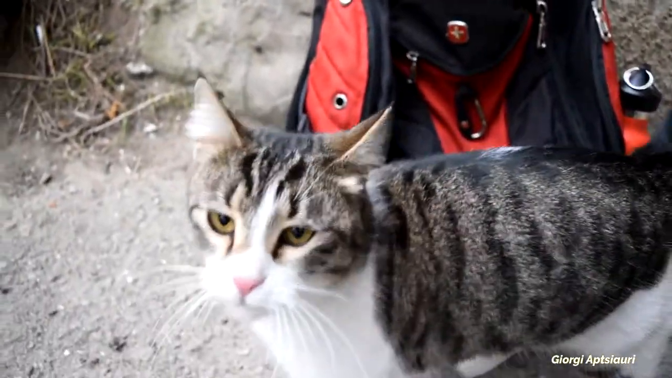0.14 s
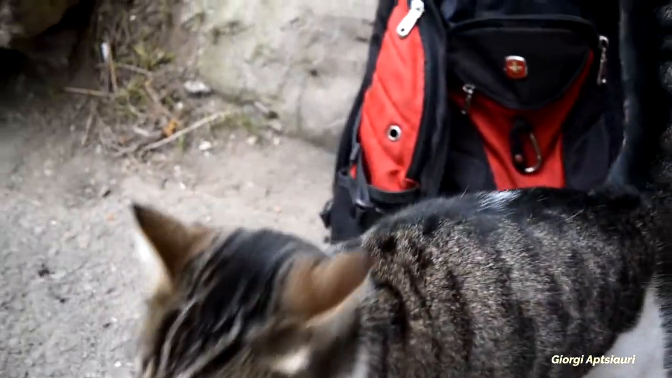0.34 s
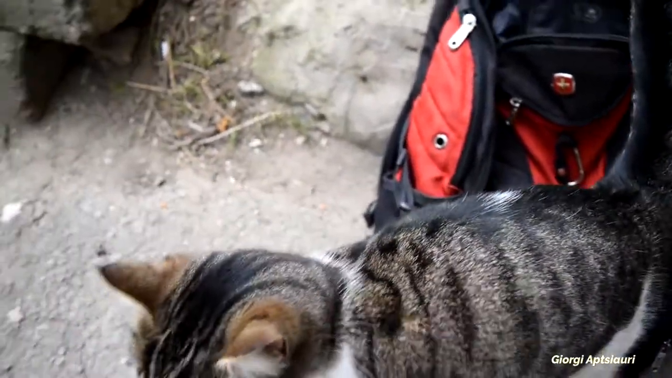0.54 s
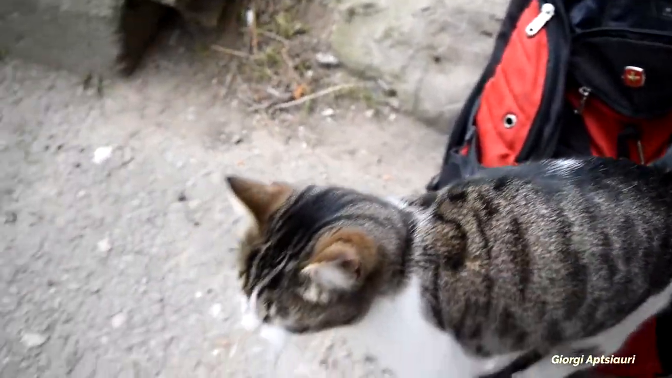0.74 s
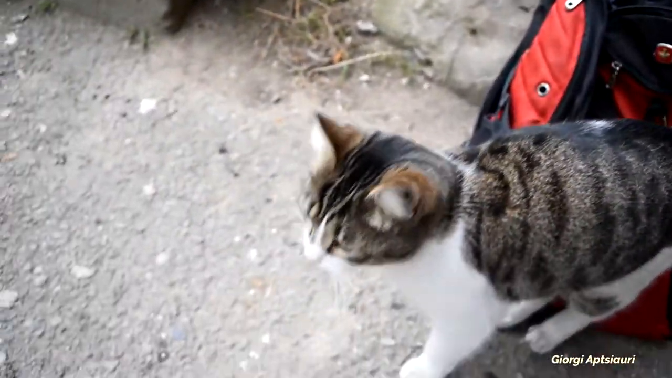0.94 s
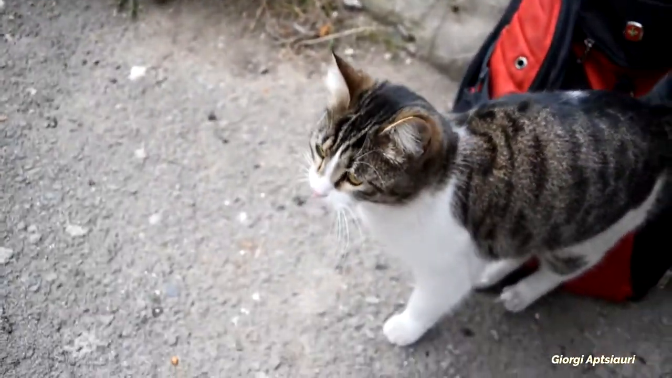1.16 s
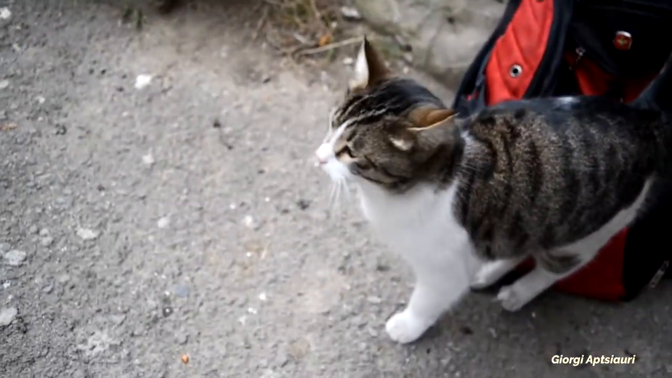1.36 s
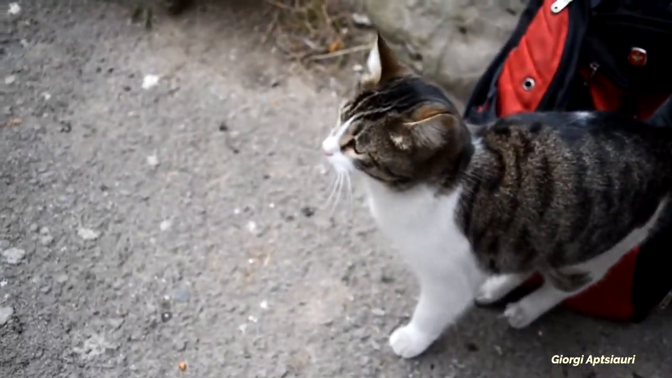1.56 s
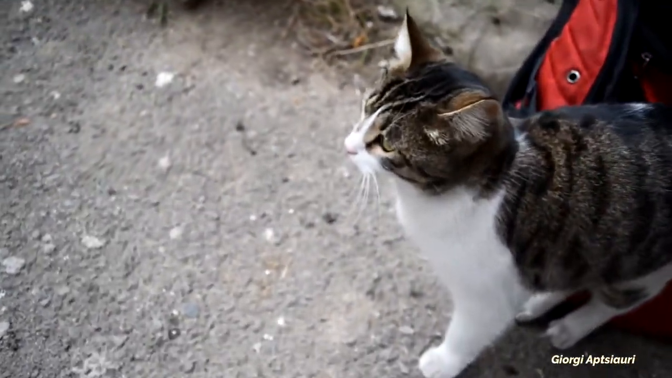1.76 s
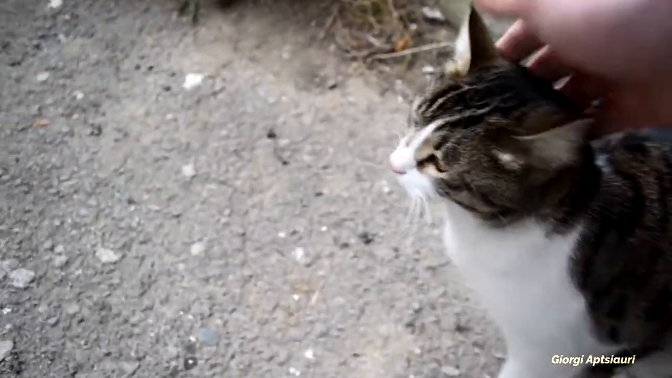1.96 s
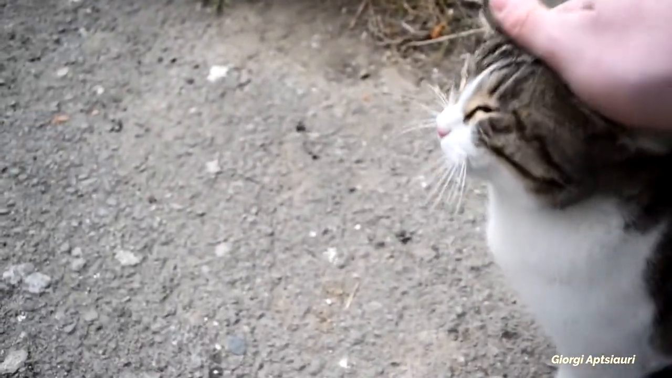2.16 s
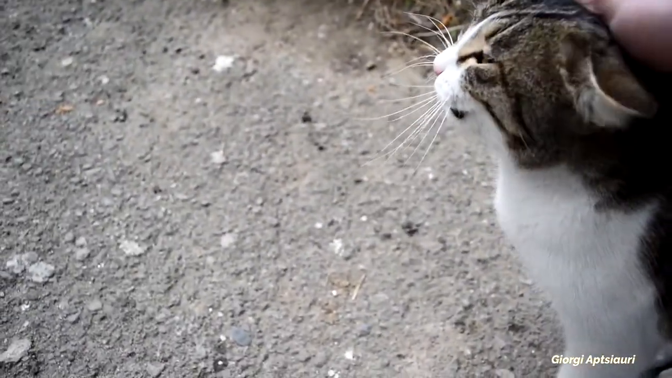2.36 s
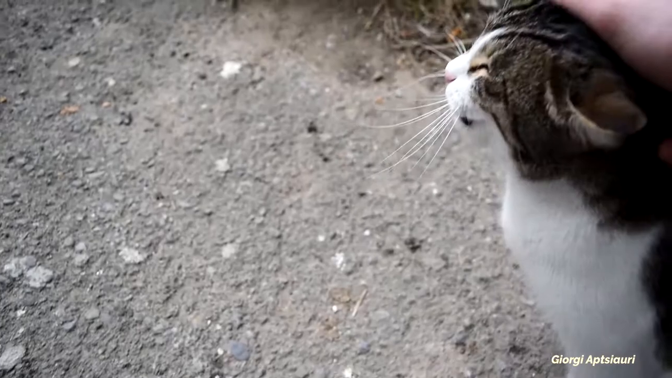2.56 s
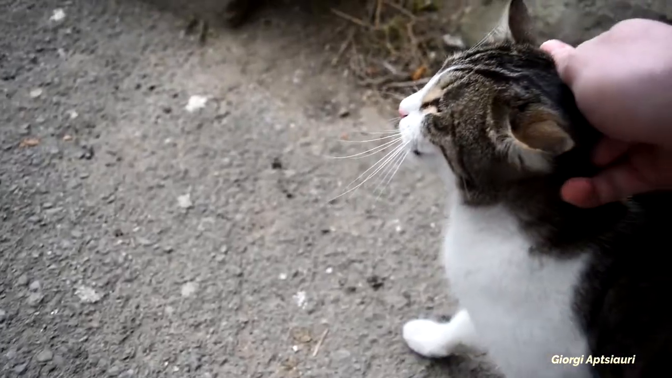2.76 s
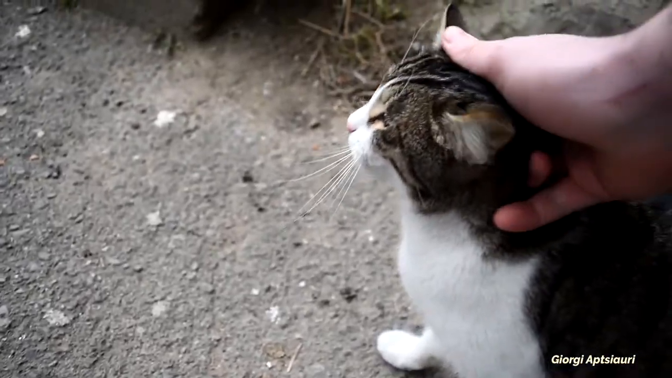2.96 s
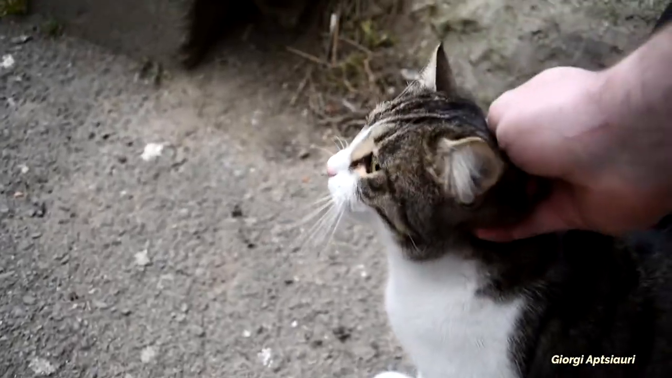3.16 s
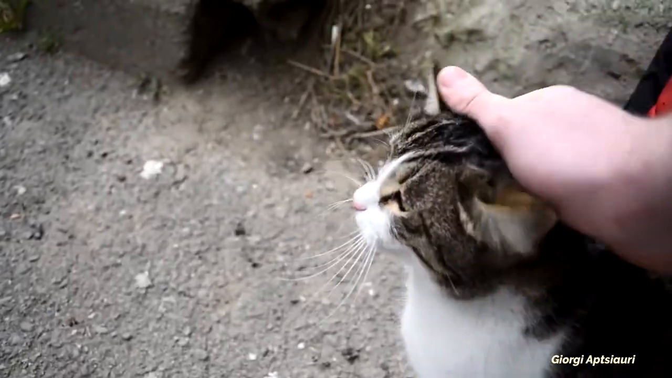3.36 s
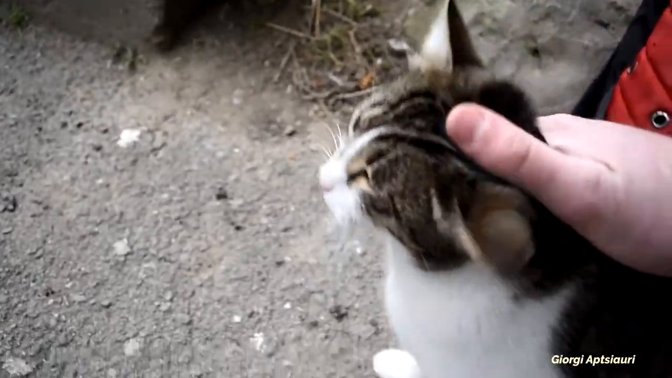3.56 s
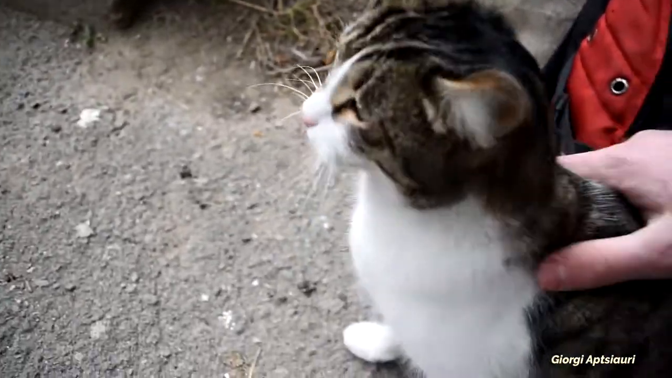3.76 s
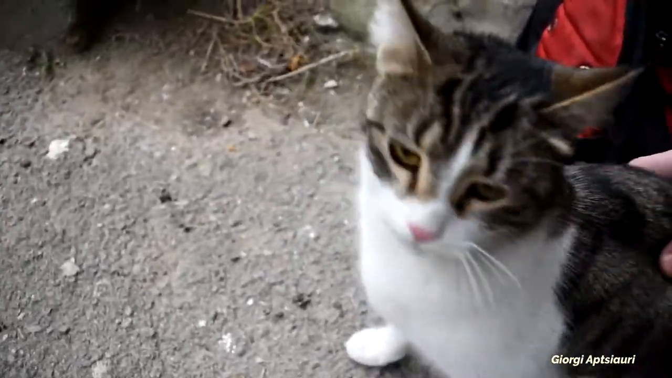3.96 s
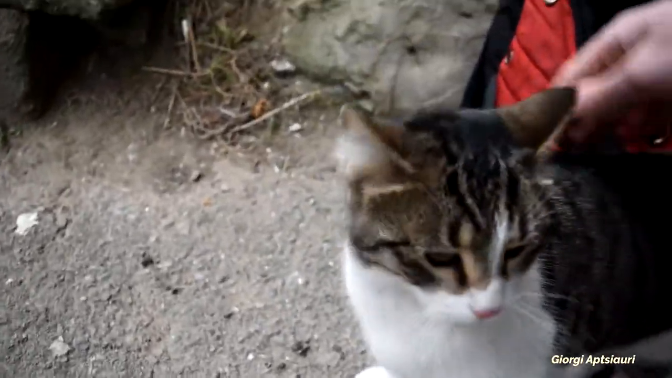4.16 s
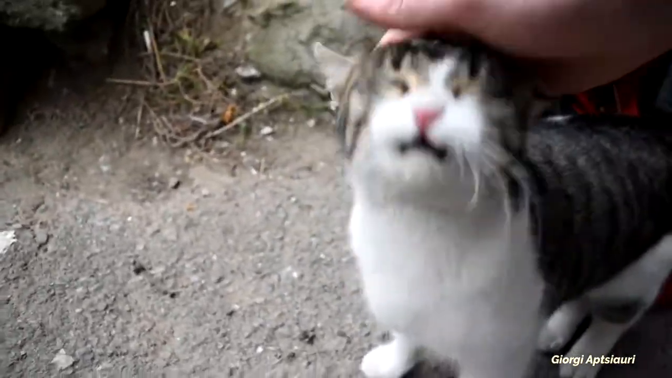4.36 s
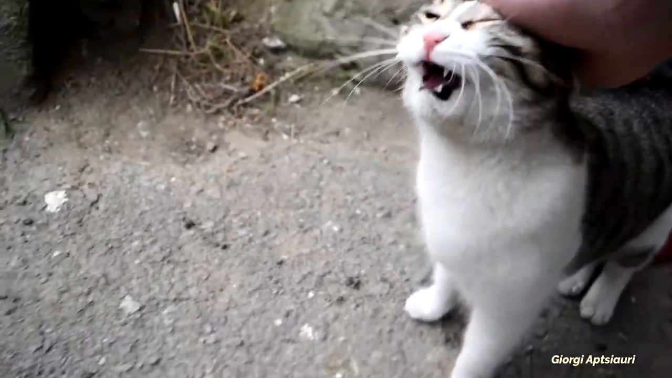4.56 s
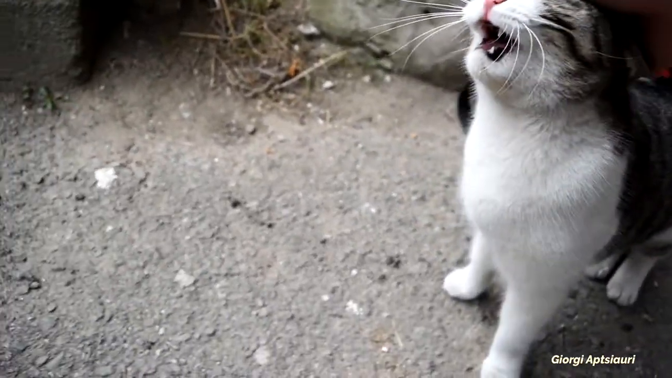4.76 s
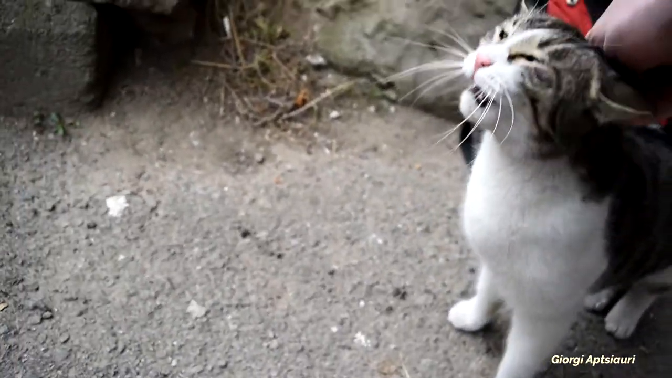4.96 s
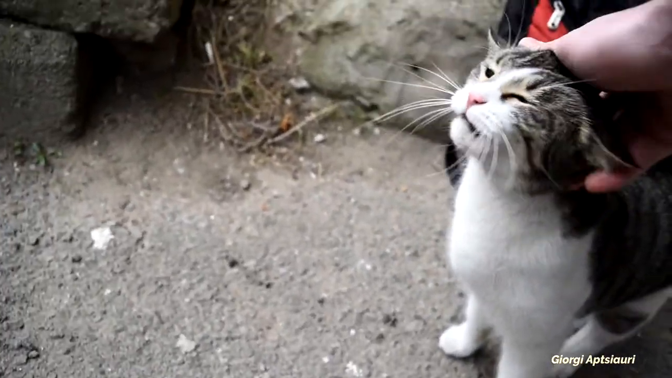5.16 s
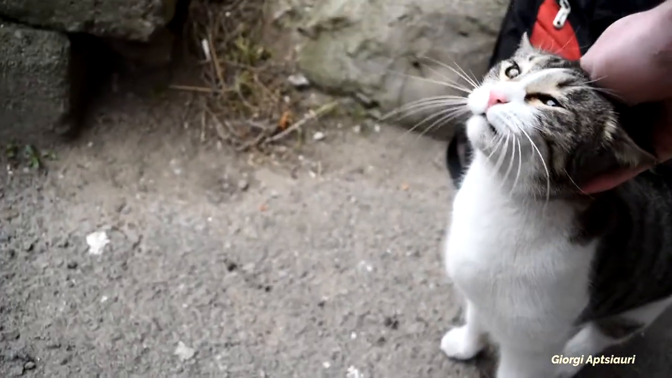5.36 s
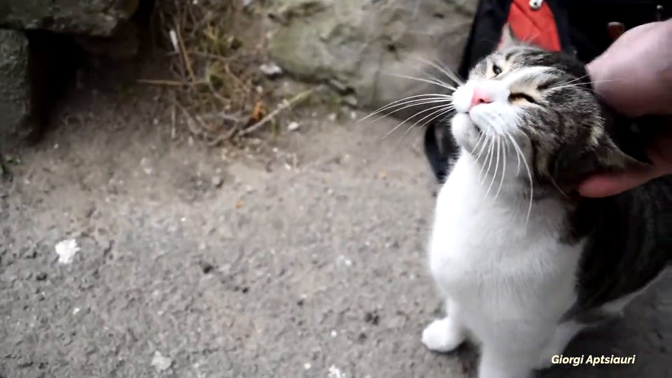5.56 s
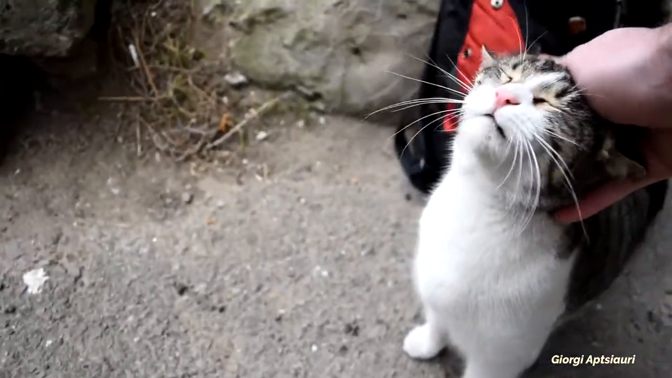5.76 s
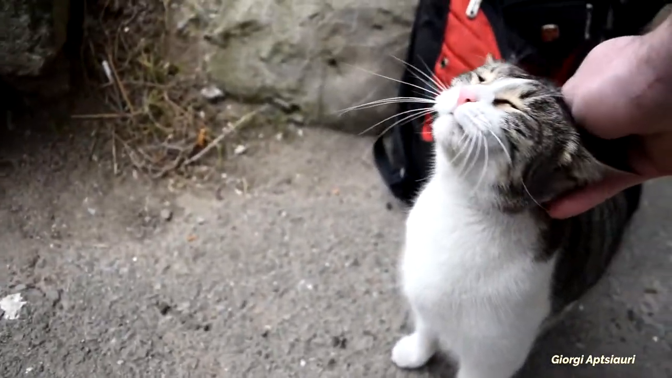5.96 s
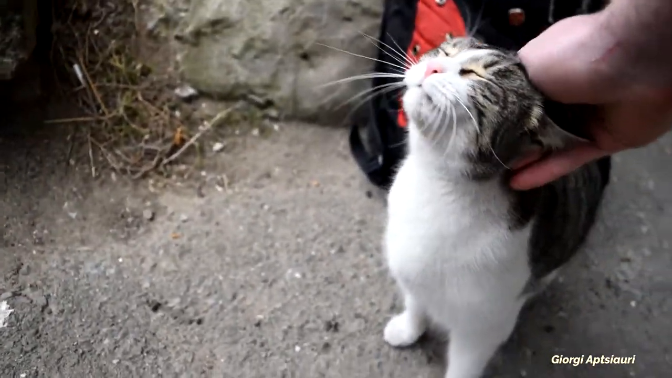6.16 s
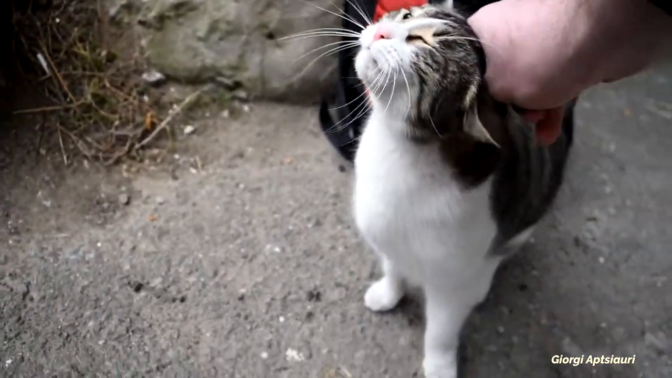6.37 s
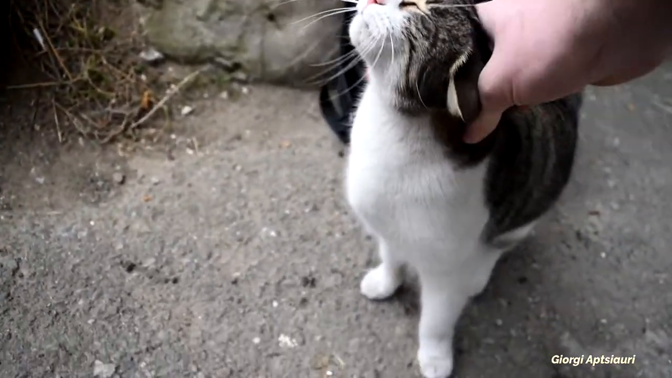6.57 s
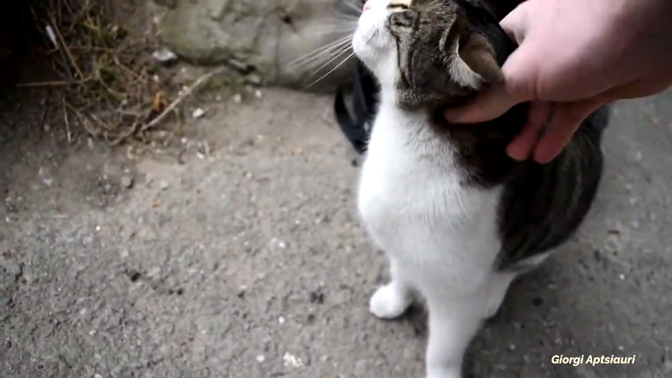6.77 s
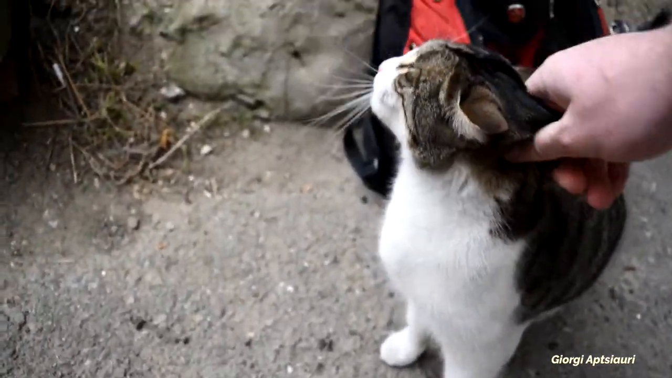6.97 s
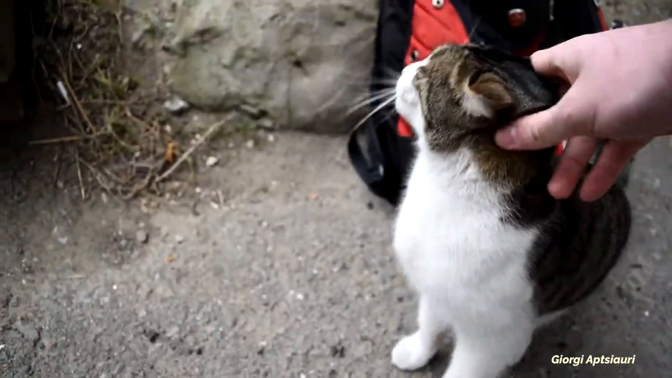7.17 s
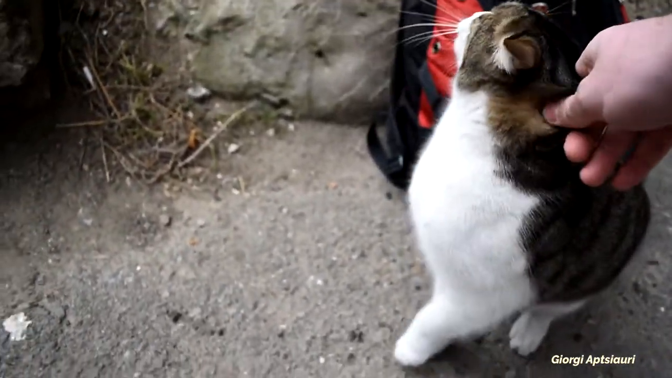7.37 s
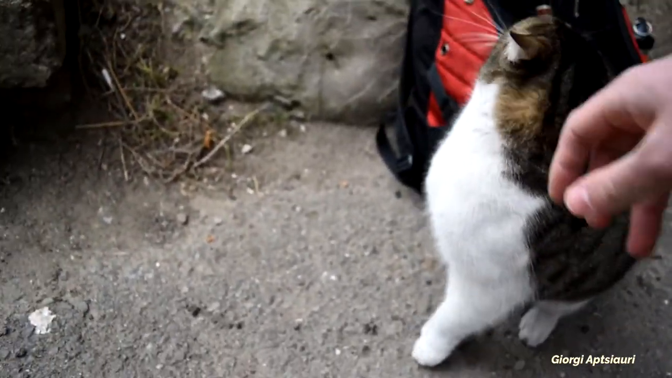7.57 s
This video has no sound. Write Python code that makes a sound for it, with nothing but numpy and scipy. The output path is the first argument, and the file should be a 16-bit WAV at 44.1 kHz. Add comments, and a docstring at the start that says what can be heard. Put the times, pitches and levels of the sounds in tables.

```python
"""A petted cat meows

On an asphalt path, close by, a cat meows three times. Its vocal folds glide up and back in pitch,
its opening mouth shapes the tone, and throbs of purring break into the start or end of each meow.
A shoe scuffs, grit clicks, dull taps sound, a jacket rustles and a hand strokes fur.
A sleeve swishes at the end, and traffic murmurs far off throughout."""
import sys
import numpy as np
from scipy import signal
from scipy.fft import rfft, irfft, next_fast_len
from scipy.io import wavfile
from scipy.ndimage import map_coordinates

SR = 44100
rng = np.random.default_rng(int(sys.argv[2]) if len(sys.argv) > 2 else 0)


def transcribe(signal):
    """Save signal, clipped to [-1, 1], as a 16-bit WAV file at the path in sys.argv[1]."""
    frames = np.atleast_2d(signal).T
    limited = np.clip(frames, -1, 1)
    pcm = np.round(limited * 32767).astype(np.int16)
    wavfile.write(sys.argv[1], SR, pcm)


N = 335601

# The tone of each noise, from low to high: frequency_hz, level_db
TRAFFIC_TONE = [(22, -21), (40, -5), (65, -6.5), (130, -4), (320, -9.5), (520, -11), (1100, -10),
                (1840, -14), (3400, -22.5), (4300, -20.5), (5300, -28), (5850, -21.5), (6400, -28),
                (7200, -25), (11000, -33.5), (15700, -37)]
SCUFF_TONE = [(120, -35), (200, -10.5), (360, -25.5), (522, -4.5), (1270, -9), (1780, -7), (4910, -25),
              (5760, -26.5), (8070, -23.5), (14000, -46.5)]
CRACK_TONE = [(200, -33), (800, -16), (2100, -17.5), (4300, -10), (6000, -5.5), (7500, -17), (10400, -19.5),
              (15500, -33)]
CLOTH_TONE = [(1200, -34), (2500, -4.5), (4200, 1), (5900, -3), (7200, -5.5), (10000, -10.5), (15500, -29)]
FUR_TONE = [(5000, -11), (7200, -10), (8200, -1.5), (10000, -6.5), (12500, -18), (15000, -26)]
SLEEVE_TONE = [(35, -43), (60, -15), (253, -4), (285, -16), (312, -9.5), (533, -4), (910, -10.5),
               (2710, -8), (3500, -13), (4120, -7.5), (9080, -16.5), (15500, -31)]
# How alike a noise is on the left and right: frequency_hz, likeness (1 = the same)
STEREO_LIKENESS = [(100, 1), (1500, 0.98), (3100, 0.92), (6800, 0.64), (14000, .1)]
# Swells of a far engine, a dragging shoe and a stroking hand: middle_s, half_length_s, level_db
ENGINE_SURGES = [(6.15, 0.18, -61.5), (6.78, .1, -60)]
SHOE_PUSHES = [(.595, .04, -49.5), (.703, 0.04, -42.5), (.823, 0.055, -46)]
HAND_STROKES = [(2.5, 0.16, -61), (2.93, 0.2, -62), (4.58, 0.31, -60.5), (5.91, 0.08, -64.5),
                (6.2, .11, -63.5)]
# The glide and effort of each meow, before purring is added: time_s, pitch_hz, relative_level_db
FIRST_MEOW = [(.235, 559.5, -54), (.283, 545, -54), (.308, 593, -44.5), (.342, 607, -43),
              (0.371, 645, -54.5), (.42, 801, -51.5), (0.492, 833, -60.5), (0.534, 788.4, -50.5),
              (0.599, 866, -53), (.7, 787, -52.5), (.87, 763, -69)]
SECOND_MEOW = [(2.15, 640, -78), (2.228, 622, -55.5), (2.265, 637.6, -48), (2.33, 772, -42.5),
               (2.371, 810, -46), (2.405, 888, -51), (2.484, 888, -51.5), (2.525, 796, -53.5),
               (2.62, 816, -53), (2.759, 780, -52), (2.8, 782, -78)]
THIRD_MEOW = [(4.32, 473, -71), (4.455, 470.4, -55.5), (4.486, 524.5, -47.5), (4.518, 601, -41),
              (4.56, 704.4, -44.5), (4.6, 769, -42.5), (4.688, 891, -44.5), (4.72, 833, -43.5),
              (4.774, 830, -43.5), (4.844, 761.6, -47), (4.906, 784, -47), (4.96, 740, -59.5),
              (5.11, 728, -57)]
# The mouth in each meow. A resonance is a range of frequencies that it boosts:
# opens_s, mouth_resonance_hz, sharpness_q, upper_resonance_hz, treble_db, top_note_darkening_db
MOUTH_SHAPES = [(0.274, 2010, 3, 7300, -9, 3.5), (2.239, 2116, 12, 6850, -9.5, 9),
                (4.436, 2350, 4.5, 8040, -1, 4)]
# How the throat and nose colour the voice: frequency_hz, gain_db
THROAT_TONE = [(480, -8.5), (650, -13.5), (880, -8.2), (1270, 2.5), (1920, -2.5), (2480, 1.5), (3150, -3.5),
               (3850, -4.5), (4850, -13.5), (6250, -4.5), (7300, .5), (8800, 1.5), (11500, -11.5)]
# Runs of purr throbs: first_s, last_s, spacing_s, first_gain_db, last_gain_db, roughness (0 to 1)
PURR_RUNS = [(.271, .324, .0265, -6, -5, .2), (2.184, 2.247, .0315, 2, 0, .5),
             (2.553, 2.742, .0315, 6, -4.5, .16), (4.957, 5.016, .0295, 10.5, 15, .06),
             (5.033, 5.084, .017, 12, 11.5, .18)]
# How far the voice's wave is ahead at the right microphone: frequency_hz, lead_radians
RIGHT_LEAD = [(5500, 0.066), (8500, 0.98), (12000, .4)]
# Dull taps: start_s, peak_db, pitch_hz
DULL_TAPS = [(.427, -38, 2040), (0.451, -33, 740), (0.588, -32, 1840), (1.365, -42, 1390),
             (1.392, -33.5, 1390), (1.499, -35, 1000), (4.072, -40.5, 1930), (5.088, -27, 800),
             (5.111, -31.5, 745), (5.3798, -32, 554), (5.393, -35, 794)]
# Sharp clicks of breaking grit: start_s, level_db
GRIT_CLICKS = [(0.5863, -38), (1.4317, -36), (1.472, -36), (1.5, -33.5), (1.5266, -17.5), (1.532, -27.5),
               (4.431, -33.5)]
# The notes that grit rings with: pitch_hz, width_hz (wider dies sooner), relative_level_db
GRIT_RINGS = [(820, 580, -22), (1430, 110, -20), (2440, 180, 6.5), (4630, 130, -18), (4960, 85, -30),
              (6340, 130, 2)]
# Light rustles of a jacket: middle_s, half_length_s, low_swish_db, high_hiss_db
JACKET_SHIFTS = [(1.039, 0.015, -66, -58.5), (1.119, 0.019, -79, -55.5), (1.487, 0.035, -55.5, -53.5),
                 (1.958, 0.065, -56, -63), (2.1, 0.067, -79, -62.5), (2.878, 0.24, -70, -65),
                 (3.528, 0.028, -56, -59), (3.86, 0.12, -60, -76), (4.426, 0.11, -59, -63.5),
                 (5.428, 0.11, -56, -59), (6.17, 0.042, -61.5, -60.5)]

SHUT_HZ, SHUT_ROUGHNESS = 600, .2  # closed lips make a low, hoarse murmur
LIPS_S, JAW_S = .0067, .07  # the lips part quickly, then the jaw widens more slowly
MOUTH_RISE, UPPER_RISE = .26, .56  # a narrow jaw holds each resonance down by this share
TOP_NOTE_HZ, TOP_NOTE_WIDTH_HZ = 834, 38  # above this pitch the voice turns soft and pure
THROB_HALF_S, THROB_SCATTER = .007, .139  # half a throb's length; how much throbs vary
THROB_SAG, THROB_DULL_DB = .15, 3  # share of pitch, and treble, lost in a typical throb
DEEPEN_PER_S = 4.84  # the pitch sags further as a run of throbs goes on


def amp(db):
    """Turn decibels into a gain to multiply by."""
    return 10 ** (np.asarray(db) / 20)


def unit(x):
    """Scale a signal to an average (rms) level of 1."""
    return x / np.sqrt(np.mean(x ** 2) + 1e-20)


def along(points, hz):
    """Read between the rows of a frequency table, on a log scale."""
    freqs, values = np.transpose(points)
    return np.interp(np.log(hz + 1), np.log(freqs + 1), values)


def step(x):
    """A soft step from 0 to 1 around x = 0."""
    return .5 + .5 * np.tanh(x / 2)


def wobble(rate, t):
    """A smooth curve through `rate` random values a second."""
    return map_coordinates(rng.standard_normal(size=4096), [(t - t[0]) * rate], mode="wrap")


def swells(rows, t):
    """A gain made of one bell-shaped rise and fall for each row."""
    return sum(amp(db) * np.exp(-((t - s) / half) ** 2 / 2) for s, half, db in rows)


def filtered(x, response):
    """Multiply each frequency in x by response(hz)."""
    n = x.shape[-1]
    padded = next_fast_len(n + SR // 4)
    return irfft(rfft(x, padded) * response(np.fft.rfftfreq(padded, 1 / SR)), padded)[..., :n]


def add(track, start_s, sound):
    """Mix a sound into a track."""
    part = track[..., round(start_s * SR):][..., :sound.shape[-1]]
    part += sound[..., :part.shape[-1]]


def stereo_noise(tone):
    """Noise with the given tone, nearly the same on both sides in the bass."""
    def response(hz):
        spread = np.arccos(np.clip(along(STEREO_LIKENESS, hz), -1, 1)) / 2
        return amp(along(tone, hz)) * [np.cos(spread), np.sin(spread)]
    mid, side = filtered(rng.standard_normal((2, N)), response)
    return unit(np.array([mid + side, mid - side]))


def town(t, traffic_db=-55.5, sway_db=1.5, engine_hz=64, idle_db=-69):
    """Distant traffic murmurs while one engine swells and fades over its idle."""
    hum = np.sin(2 * np.pi * np.cumsum(engine_hz + 3 * wobble(5, t)) / SR)
    engine = hum * (amp(idle_db) + swells(ENGINE_SURGES, t)) * amp(2.2 * wobble(3.1, t))
    return amp(traffic_db + sway_db * wobble(4, t)) * stereo_noise(TRAFFIC_TONE) + engine


def resonance(hz, centre_hz, q):
    """Air in the mouth boosts sound near centre_hz, more sharply for a higher q."""
    return 1 / (1 - (hz / centre_hz) ** 2 + 1j * hz / (centre_hz * q))


def meow(glide, opens_s, open_hz, mouth_q, upper_hz, treble_db, dark_db, breath_db=-29):
    """The vocal folds make harmonics (multiples of the pitch), and the moving mouth shapes them."""
    times, notes, levels = np.transpose(glide)
    t = np.arange(int(times[0] * SR), int(times[-1] * SR)) / SR
    note_hz, level_db = np.interp(t, times, notes), np.interp(t, times, levels)
    sag, throb_db, hoarse = purr(t)
    pitch_hz = note_hz * (1 - sag)

    parted = step((t - opens_s) / LIPS_S)
    narrow = np.exp(-np.maximum(t - opens_s, 0) / JAW_S)
    mouth_hz = SHUT_HZ + (open_hz * (1 - MOUTH_RISE * narrow) - SHUT_HZ) * parted

    # slack or feeble folds vibrate unevenly
    slack = np.clip((570 - note_hz) / 170, 0, .4)
    feeble = np.clip((-57 - level_db) / 40, 0, .2)
    rough = np.maximum(hoarse + slack + feeble, SHUT_ROUGHNESS * (1 - parted))
    waver = .008 * wobble(110, t) + .006 * wobble(500, t) + .062 * rough * wobble(700, t)
    cycles = np.cumsum(pitch_hz * (1 + waver)) / SR

    harmonic = np.arange(1, 20)[:, None]
    hz = harmonic * pitch_hz
    treble = np.clip((hz - 2500) / 700, 0, 1)  # only the treble depends on where the head points
    bright_db = (treble_db - THROB_DULL_DB * sag / THROB_SAG) * treble
    pure_db = dark_db * step((note_hz - TOP_NOTE_HZ) / TOP_NOTE_WIDTH_HZ) * np.maximum(3 - harmonic, 0)
    weights = amp(along(THROAT_TONE, hz) + bright_db + pure_db) * resonance(hz, mouth_hz, mouth_q)
    weights *= resonance(hz, upper_hz * (1 - UPPER_RISE * narrow), q=12)
    weights /= np.linalg.norm(weights, axis=0)

    # swirling breath spreads noise around every harmonic
    swirl = np.array([wobble(650, t) + 1j * wobble(650, t) for _ in harmonic])
    breath = (amp(breath_db) + 1.65 * rough) * swirl
    voice = np.real(weights * (1 + breath) * np.exp(2j * np.pi * harmonic * cycles)).sum(0)
    fade = np.clip(np.minimum(t - t[0], t[-1] - t) / .0087, 0, 1)
    flicker_db = 1.7 * wobble(70.6, t)
    return np.sqrt(2) * voice * fade * amp(level_db + throb_db + flicker_db)


def purr(t):
    """Each throb squeezes the voice box: the pitch sags, the level shifts and the voice roughens."""
    sag, gain_db, rough = np.zeros((3, len(t)))
    for first_s, last_s, spacing_s, first_db, last_db, hoarse in PURR_RUNS:
        for s in np.arange(first_s, last_s + spacing_s / 2, spacing_s):
            half_s = THROB_HALF_S * rng.normal(1, THROB_SCATTER)
            squeeze = np.exp(-np.abs((t - s) / half_s) ** 3)
            depth = THROB_SAG * (1 + DEEPEN_PER_S * (s - (first_s + last_s) / 2))
            sag += squeeze * depth * rng.normal(1, THROB_SCATTER)
            gain_db += squeeze * np.interp(s, [first_s, last_s], [first_db, last_db])
            rough += squeeze * hoarse
    return sag, gain_db, rough


def cat(boost_db=4.5):
    """Two meows with the head turned aside, then a brighter one straight at the two microphones."""
    voice = np.zeros(N)
    for glide, mouth in zip((FIRST_MEOW, SECOND_MEOW, THIRD_MEOW), MOUTH_SHAPES):
        add(voice, glide[0][0], meow(glide, *mouth))
    sides = np.array([[-1], [1]])
    return filtered(voice * amp(boost_db), lambda hz: np.exp(.5j * along(RIGHT_LEAD, hz) * sides))


def wall_echo(sound, fade_s=.42):
    """The ground and a stone wall scatter back a short echo."""
    t = np.arange(SR // 4) / SR
    tail = rng.standard_normal((2, len(t))) * amp(-60 * t / fade_s) * (t > .003)
    tail += 2 * tail.mean(0)  # makes left and right more alike
    return signal.fftconvolve(sound[None], tail / np.linalg.norm(tail[0]), axes=1)[:, :N]


def taps(rise_s=.00034, fade_s=.0086):
    """Each dull tap is a little noise and a note that rings for only a few cycles."""
    out, t = np.zeros(N), np.arange(SR // 20) / SR
    envelope = amp(-60 * t / fade_s) * (1 - np.exp(-t / rise_s))
    for start_s, peak_db, pitch_hz in DULL_TAPS:
        noise = unit(filtered(rng.standard_normal(len(t)), lambda hz: 1 / (1 + (hz / 3000) ** 2)))
        tap = (np.sin(2 * np.pi * pitch_hz * t) + .45 * noise) * envelope
        add(out, start_s, amp(peak_db) * tap / np.abs(tap).max())
    return out


def friction(noise, t, grain_db):
    """Rubbing surfaces catch and slip in countless tiny steps, which makes their noise grainy."""
    return noise * unit(amp(grain_db * wobble(450, t)))


def shoe_scuffs(t):
    """A sole drags over asphalt in three pushes."""
    return swells(SHOE_PUSHES, t) * friction(stereo_noise(SCUFF_TONE), t, grain_db=2.5)


def grit(hold_s=.00072, fade_s=.018, crack_db=-5.5, ring_db=-17):
    """Each grain cracks and briefly rings, so close that the two microphones hear it differently."""
    out, t = np.zeros((2, N)), np.arange(SR // 20) / SR
    envelope = amp(-60 * np.maximum(t - hold_s, 0) / fade_s)
    for start_s, level_db in GRIT_CLICKS + crunch():
        cutoff_hz = 15000 * amp(.095 * (level_db + 22))  # a harder break is brighter
        noise = rng.standard_normal(len(t)) + .99 * rng.standard_normal((2, len(t)))
        crack = filtered(noise, lambda hz: amp(along(CRACK_TONE, hz)) / (1 + (hz / cutoff_hz) ** 4))
        ring = np.zeros(len(t))
        for pitch_hz, width_hz, db in GRIT_RINGS:
            strength = amp(db) * rng.normal(1, .099)
            ring += strength * np.exp(-np.pi * width_hz * t) * np.sin(2 * np.pi * pitch_hz * t)
        click = amp(crack_db) * unit(crack) * envelope + amp(ring_db) * ring
        add(out, start_s, amp(level_db) * click)
    return out


def crunch(count=8, from_s=1.445, to_s=1.522, level_db=-40.5, spread_db=2):
    """Small grains give way under weight before the big one snaps. Gives rows of start_s, level_db."""
    times = from_s + (to_s - from_s) * (np.arange(count) + rng.random(count)) / count
    return list(zip(times, rng.normal(level_db, spread_db, count)))


def jacket_rustles(t):
    """Cloth rubs as a jacket shifts, making a low swish and a high hiss."""
    swish = swells([(s, half, db) for s, half, db, _ in JACKET_SHIFTS], t)
    hiss = swells([(s, half, db) for s, half, _, db in JACKET_SHIFTS], t)
    return friction(swish * stereo_noise(SCUFF_TONE) + hiss * stereo_noise(CLOTH_TONE), t, grain_db=1.9)


def fur_strokes(t):
    """A palm slides over fur with a soft, high hiss."""
    return swells(HAND_STROKES, t) * friction(stereo_noise(FUR_TONE), t, grain_db=1.5)


def sleeve_swish(t, peak_s=7.29, peak_db=-42, rise_db_per_s=65, fall_db_per_s=258):
    """An arm pulls back: its sleeve gets louder as it gathers speed, then stops short."""
    level_db = peak_db - np.maximum(rise_db_per_s * (peak_s - t), fall_db_per_s * (t - peak_s))
    return amp(level_db) * friction(stereo_noise(SLEEVE_TONE), t, grain_db=1)


def scene(echo_db=-24):
    """Mix all the sounds. The cat, grit and taps get a faint echo."""
    t = np.arange(N) / SR
    near = cat() + grit() + taps()
    echo = amp(echo_db) * wall_echo(near.mean(0))
    rubbing = shoe_scuffs(t) + sleeve_swish(t) + fur_strokes(t) + jacket_rustles(t)
    return near + echo + rubbing + town(t)


def record(dry):
    """Cut away the very highest treble."""
    return filtered(dry, lambda hz: hz < 15750)


dry = scene()
out = record(dry)
transcribe(out)
```